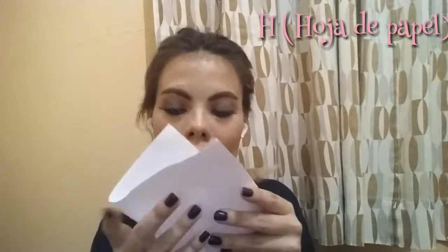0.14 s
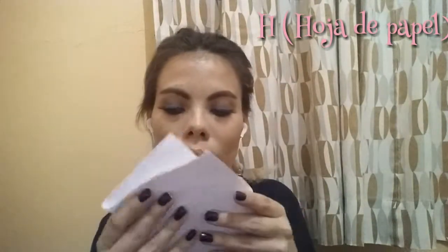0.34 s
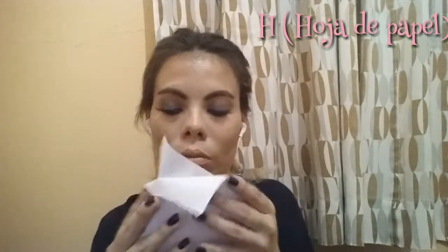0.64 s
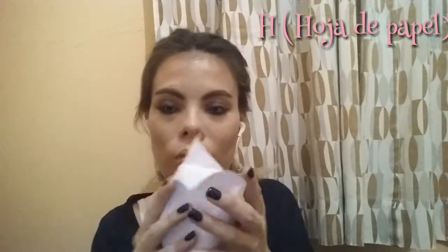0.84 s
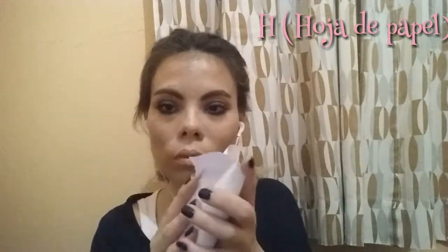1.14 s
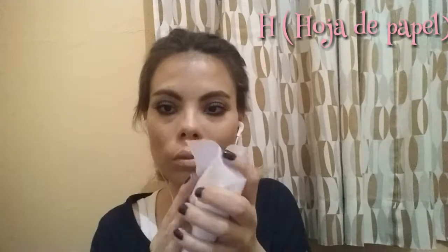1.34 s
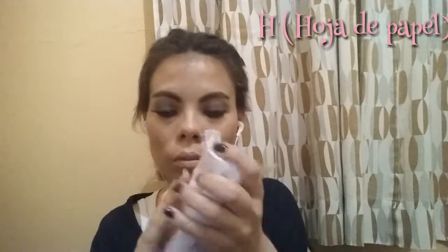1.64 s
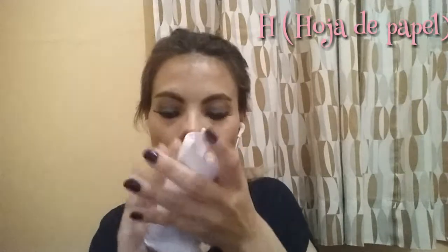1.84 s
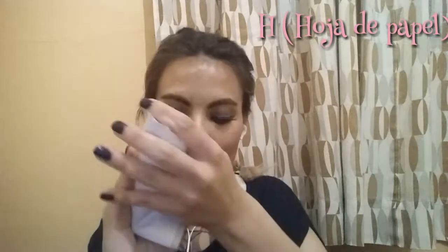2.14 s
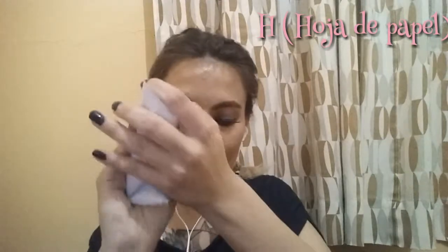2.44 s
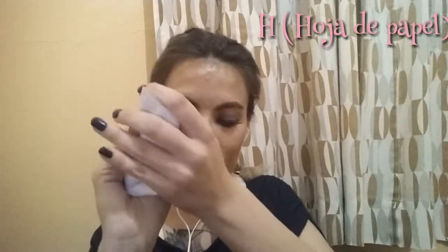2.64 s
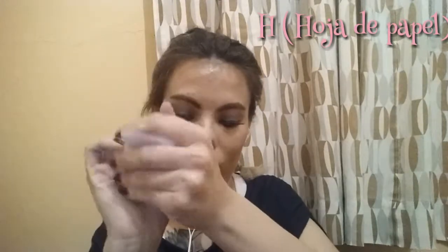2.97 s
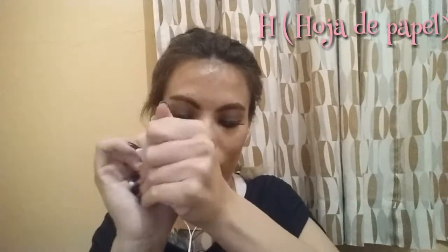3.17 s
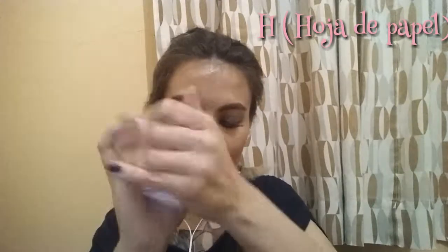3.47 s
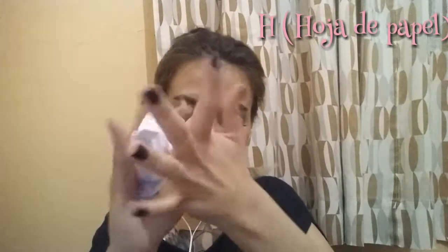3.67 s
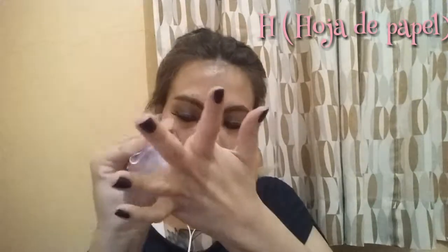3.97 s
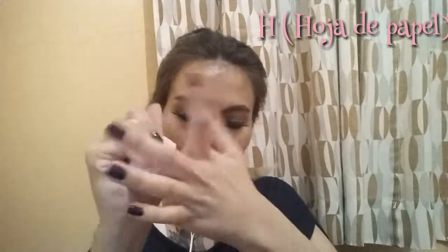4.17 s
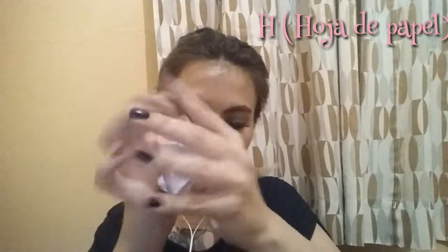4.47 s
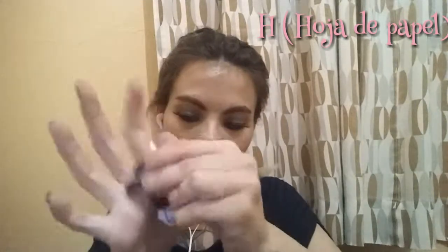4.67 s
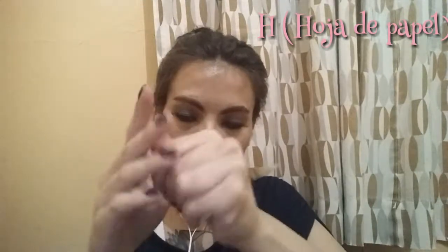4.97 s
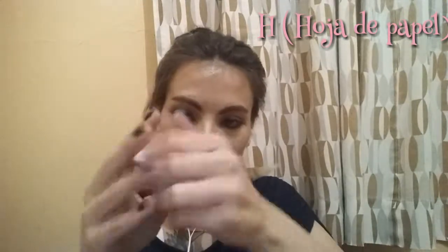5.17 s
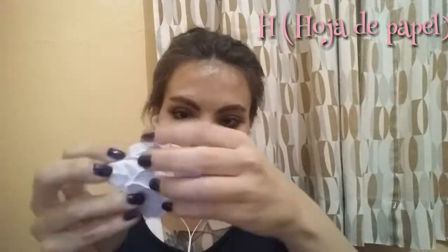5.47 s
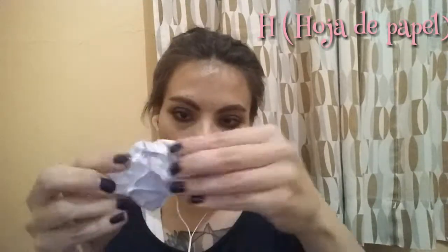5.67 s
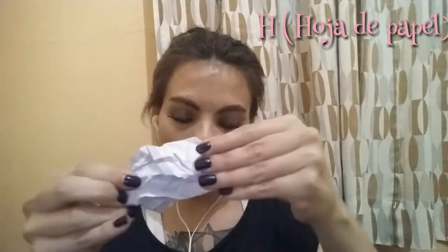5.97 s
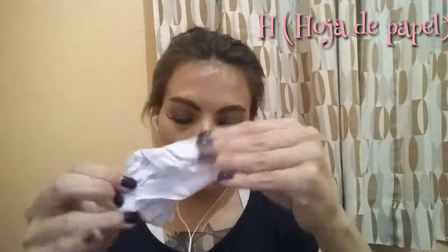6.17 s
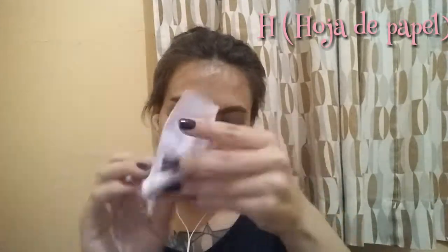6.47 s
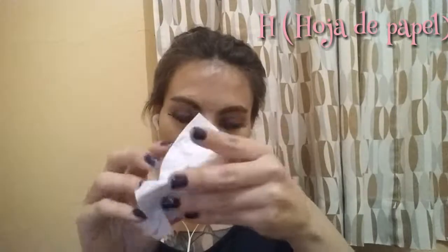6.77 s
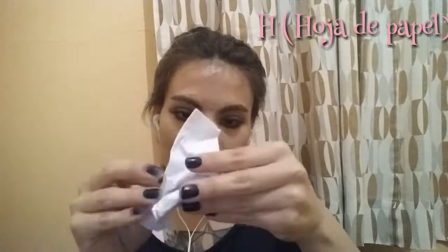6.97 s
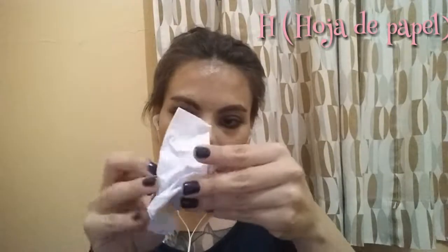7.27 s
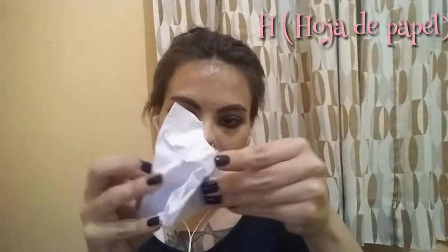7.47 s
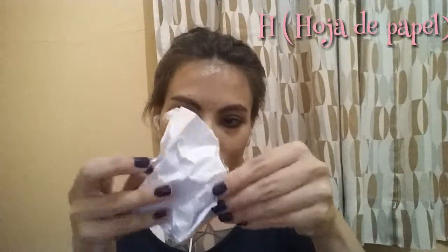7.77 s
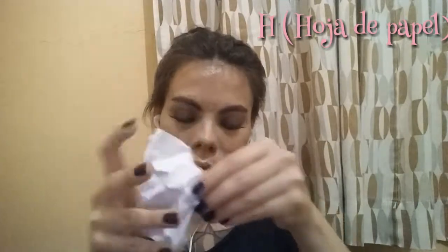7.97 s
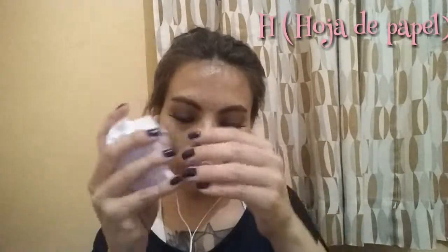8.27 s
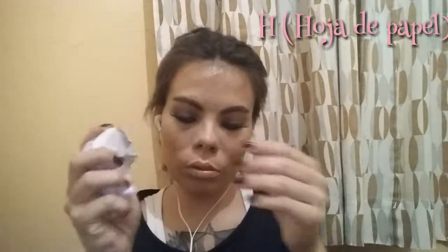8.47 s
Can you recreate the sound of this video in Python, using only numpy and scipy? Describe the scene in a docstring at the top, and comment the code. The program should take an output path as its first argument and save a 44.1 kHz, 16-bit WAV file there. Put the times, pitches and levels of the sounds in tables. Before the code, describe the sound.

Close, dry paper crumpling: clustered crackles in quick uneven squeezes, crisp snaps on top, thinning and quieting as the ball is opened, then scrunched again.

```python
"""A sheet of paper is crumpled into a ball, opened and crumpled again close to a small microphone.
Creases give way in clumps: pulses excite damped facet resonances, with filtered noise as paper rustle.
Larger creases buckle as sharp snaps, each a kick and dying noise through its own resonances.
Low thumps are decaying sines. The open sheet radiates bass, the tight ball hardly any.
A dry room, made of decaying noise reflections, and faint coloured hiss lie below."""
import sys
import numpy as np
from scipy import signal
from scipy.fft import rfft, irfft
from scipy.io import wavfile

SR = 44100
rng = np.random.default_rng(int(sys.argv[2]) if len(sys.argv) > 2 else 0)


def wav_record(signal):
    """Record a signal, one row per channel, as 16-bit PCM in the file named by sys.argv[1]."""
    frames = np.transpose(np.atleast_2d(signal))
    bounded = np.clip(frames, -1, 1)
    # unit amplitude maps onto the largest positive 16-bit level
    quanta = np.round(bounded * 32767).astype(np.int16)
    wavfile.write(sys.argv[1], SR, quanta)


N = 380141  # samples

# bursts of crackle set off by each squeeze or slip of the fingers; treble is relative to the crackle:
# start_s, hold_s, level_db, treble_db
SQUEEZES = [(0, 0.12, -60.5, -14.5), (0.197, 0.28, -61.5, -15), (0.364, 0.07, -59, -7),
            (0.438, 0.00084, -50, -18), (0.648, 0.014, -61.5, -23), (0.748, 0.0031, -49, -11),
            (0.784, 0.052, -55, -6), (0.818, 0.003, -45.5, -29), (0.864, 0.23, -61, -18.5),
            (1.01, 0.017, -54, -7), (1.247, 0.034, -49, -15.5), (1.384, 0.028, -56.5, -36),
            (1.462, 0.0031, -43, -8), (1.655, 0.022, -42.5, -15), (1.706, 0.072, -53, -21.5),
            (1.953, 0.002, -45.5, -1), (1.982, 0.11, -45.5, -17), (2.171, 0.021, -48, -18),
            (2.234, 0.062, -50, -18.5), (2.454, 0.034, -51, -12.5), (2.5, 0.75, -59, -41.5),
            (2.545, 0.14, -52.5, -20.5), (2.668, 0.075, -48, -23.5), (2.807, 0.039, -46, -19),
            (2.946, 0.039, -54.5, -15.5), (3.139, 0.004, -43, -10), (3.21, 0.042, -53.5, -10),
            (3.536, 0.02, -47, -15), (3.599, 0.025, -50.5, -9.5), (3.714, 0.044, -60.5, -40),
            (3.807, 0.041, -60, -45), (3.96, 0.038, -52.5, -16), (4.046, 0.0055, -49.5, -23),
            (4.165, 0.086, -54, -11.5), (4.451, 0.0036, -61, -10), (4.478, 0.014, -51, -11),
            (4.515, 0.025, -49, -14), (4.65, 0.0051, -52.5, -8), (4.687, 0.12, -55.5, -22),
            (4.741, 0.0073, -50, -8), (4.88, 0.049, -56.5, -18), (4.943, 0.018, -57, 1.5),
            (5.265, 0.0078, -52.5, -1), (5.282, 0.11, -61.5, -9.5), (5.371, 0.0012, -50.5, -20),
            (5.585, 0.04, -64, -14), (5.653, 0.0014, -50, -10), (5.788, 0.053, -61, -6),
            (5.91, 0.057, -64, -11), (5.967, 0.24, -66.5, -19), (6.044, 0.017, -57, -11.5),
            (6.3, 0.014, -53.5, -7), (6.539, 0.0035, -60, -18), (6.578, 0.059, -59, -11.5),
            (6.713, 0.008, -54, -7.5), (6.752, 0.13, -55.5, -15), (6.981, 0.0017, -49, -19),
            (7.07, 0.018, -51.5, -16), (7.167, 0.093, -69, -33), (7.491, 0.027, -51, -12.5),
            (7.557, 0.058, -47, -7.5), (7.748, 0.018, -47.5, -10.5), (7.935, 0.0014, -50.5, -11),
            (8.16, 0.0049, -58, -35), (8.229, 0.026, -64.5, -26), (8.313, 0.062, -60.5, -18),
            (8.366, 0.0016, -53.5, -6.5), (8.513, 0.056, -59, -9)]
# time for the crackle to rise or fall by 10 dB: a fixed part plus a share of the hold
ATTACK_S, ATTACK_PER_HOLD = 0.0047, 0.93
RELEASE_S, RELEASE_PER_HOLD = 0.02, 0.26
TREBLE_STEEPER = 1.43  # ratio of treble slope to crackle slope in dB: it comes later and goes sooner
# paper slides evenly on paper, with softer ticks and denser, more even pops: start_s, end_s
SLIDES = [(0, .4), (2.32, 2.65), (7.12, 7.7)]
# bass of the sheet relative to the crackle, weaker as it is balled up: time_s, bass_db
SHEET_BASS = [(0, -5), (.25, -9), (.45, -4), (.85, -4.5), (1.05, -17.5), (1.3, -8.5), (1.75, -14.5),
              (2.1, -14.5), (2.6, -18.5), (3.15, -18.5), (3.42, -31), (3.57, -9), (4.3, -36.5),
              (4.55, -21.5), (5.3, -23.5), (5.6, -21), (5.85, -21.5), (6.6, -25.5), (6.85, -7.5),
              (7.1, -26.5), (7.8, -18.5), (8.62, -26.5)]
# relative level of the upper middle: time_s, gain_db
BRIGHTNESS = [(0, 3.5), (1.2, 4.5), (2, -5.5), (2.75, -7), (3.6, 4), (4.7, -1.5), (5.2, 3), (7.25, -2.5),
              (7.6, 0), (8.62, 8)]
# paper as the microphone colours it, relative density per Hz: frequency_hz, density_db
PAPER_SPECTRUM = [(60, -52), (129, -26.5), (285, -22), (523, -17), (758, -11), (1180, -3.5), (1630, -5),
                  (2490, -1.5), (4450, -6.5), (6450, -11.5), (7960, -24.5), (9590, -27.5), (12000, -35),
                  (15600, -43)]
# borders between deep bass, bass, middle, treble and top: edge_hz
BAND_EDGES_HZ = [230, 720, 6800, 11000]
# buckling creases; peak is that of the middle band, treble is relative to it, decay is nominal:
# start_s, peak_db, ring_hz, treble_db, decay_s
SNAPS = [(0.426, -32, 950, -7, 0.0042), (0.445, -29, 1410, -28, 0.021), (0.476, -22.5, 3430, -5.5, 0.019),
         (0.616, -23, 3080, -46, 0.012), (0.641, -35, 2430, -29, 0.004), (0.704, -39, 1090, -24, 0.016),
         (0.732, -43.5, 1260, 5, 0.009), (0.791, -21, 2140, -11.5, 0.012), (0.81, -18, 2130, -12.5, 0.016),
         (0.816, -23, 2240, -41, 0.0032), (0.962, -37, 3180, -49, 0.013), (1.069, -34, 2570, -18, 0.0059),
         (1.094, -33, 1260, -31, 0.021), (1.287, -29.5, 1960, -19, 0.0039),
         (1.331, -30.5, 1880, -23, 0.015), (1.616, -35.5, 1180, -8.5, 0.09),
         (1.653, -15, 3790, -15.5, 0.0026), (1.945, -33, 1950, -10, 0.077), (2.048, -32, 2780, -33, 0.013),
         (2.151, -33, 2140, -40, 0.026), (2.229, -36, 1180, -9, 0.019), (2.246, -33, 2490, -13.5, 0.067),
         (2.6762, -26.5, 1850, -57, 0.0022), (2.831, -25.5, 3060, -3.5, 0.0096),
         (2.888, -19.5, 1680, -14.5, 0.012), (2.955, -25.5, 2160, -3, 0.01), (3.07, -33.5, 3600, -61, 0.01),
         (3.1381, -22, 1960, -4.5, 0.013), (3.183, -33, 4600, -27, 0.0087), (3.209, -34, 4860, -11, 0.011),
         (3.218, -12, 2330, -70, 0.0055), (3.238, -33.5, 1940, -8.5, 0.015),
         (3.293, -35.5, 3270, -10, 0.0082), (3.392, -42.5, 2220, -44, 0.0099),
         (3.428, -37, 3240, -44, 0.0057), (3.408, -44, 2470, -40, 0.006), (3.549, -32.5, 3596, -9, 0.02),
         (3.568, -31, 880, -2, 0.011), (3.602, -42, 1510, -14, 0.012), (3.618, -29.5, 2620, -13, 0.015),
         (3.977, -34.5, 2260, -26, 0.0057), (4.049, -33, 2160, -19, 0.012), (4.2, -17.5, 3380, -40, 0.0081),
         (4.278, -41.5, 3100, -11, 0.065), (4.456, -38, 3000, -20, 0.024), (4.517, -29, 1740, -5, 0.011),
         (4.647, -38.5, 1830, -43, 0.012), (4.666, -31, 1550, -30, 0.0058), (4.683, -41, 2000, -30, 0.015),
         (4.751, -25.5, 1670, -13, 0.0045), (4.866, -29.5, 1840, -48, 0.01),
         (4.907, -27, 2490, -10.5, 0.0021), (5.058, -49, 3800, -35, 0.015),
         (5.317, -32.5, 2430, -6.5, 0.013), (5.61, -40.5, 5070, -7.5, 0.015),
         (5.803, -38.5, 2700, -8, 0.028), (5.816, -36, 2850, -1, 0.027), (5.853, -35.5, 1870, -38, 0.019),
         (5.8814, -19.5, 1940, -50, 0.01), (6.859, -33, 1330, -15, 0.012), (7.082, -35, 2800, -17.5, 0.03),
         (7.748, -34.5, 3000, -7, 0.029), (7.943, -32.5, 2160, -11.5, 0.024),
         (8.277, -34, 3100, -33, 0.012), (8.366, -30, 4700, -35, 0.017), (8.512, -22.5, 2880, -14.5, 0.009),
         (8.577, -38, 3860, -5.5, 0.068)]
# low thumps, the first right at the start; level is before the envelope: start_s, level_db, pitch_hz
THUMPS = [(0.01, -61, 129), (0.442, -48, 137), (0.795, -61, 169), (2.634, -45.5, 314), (3.138, -45.5, 403)]
ROOM_T60_S, ROOM_DB = 0.1, -23
# background hiss, relative density per Hz: frequency_hz, density_db
HISS_SPECTRUM = [(20, -4), (60, -1), (500, -1), (1500, -9), (5500, -7.5), (7500, -17), (16000, -22.5)]
HISS_DB = -78.5  # rms
STOP_EDGE_HZ = 15900  # from here up the top is at least 40 dB down


def crackle(per_s, spread_db, clump_db, rustle_db, count=10):
    """Clustered impulses: creases pop in clumps, facets ring by size, and sliding paper rustles between."""
    t = np.arange(N) / SR
    sliding = sum((t >= start) & (t < end) for start, end in SLIDES)
    uneven = 1 - 0.5 * sliding
    clump = uneven * clump_db * (slips(per_s=60, fade_s=0.008) + 0.6 * drift(100))

    sizes_db = uneven * spread_db * np.minimum(rng.exponential(1, N), 4)
    sizes = from_db(sizes_db) * rng.choice([-1, 1], N)
    # sliding evens the pops out: smaller spread, denser in time
    chance = per_s * from_db(clump) / uneven ** 2 / SR
    pops = sizes * (rng.random(N) < chance) + 1e-18
    facet = rng.integers(0, count, N)
    rings = 1.1 * pops
    for k, hz in enumerate(np.geomspace(500, 11000, count)):
        ring = resonance(pops * (facet == k), hz, 0.5 * hz)
        rings = rings + ring * np.sqrt(9000 / hz)  # big facets ring low
    rustle = rng.standard_normal(N) * from_db(rustle_db + clump)

    enclosed = rms_one(folds(rms_one(rings) + rustle, shift_db=2.8))
    direct = 0.3 * rms_one(rings)  # outer creases are heard directly
    bands = five_bands(coloured(enclosed + direct, PAPER_SPECTRUM))
    top_filter = signal.butter(6, BAND_EDGES_HZ[-1], "high", fs=SR, output="sos")
    bands[4] = signal.sosfilt(top_filter, bands[4])

    level_db, treble_db = hands(t)
    bass_db, = in_time(SHEET_BASS, t)
    bright_db, = in_time(BRIGHTNESS, t)
    # an open sheet is fuller in the low middle too
    bands[2] = shelve(bands[2], 0.3 * (bass_db + 10.5), bright_db)
    air_db = treble_db + 0.4 * level_db + 5  # only a hard crush reaches the top
    levels = tilts(bass_db, treble_db, top_db=air_db)
    bed = sum(rms_one(band) * from_db(level_db + db) for band, db in zip(bands, levels))
    tick_db = -10 - 0.3 * bass_db  # a tight ball ticks more than an open sheet
    return bed + uneven * ticks(per_s=280) * from_db(level_db + tick_db)


def hands(t):
    """Addition of powers: attack, hold and release of all squeezes give crackle level and treble in dB."""
    start, hold, level_db, treble_db = np.transpose(SQUEEZES)[:, :, None]
    coarse = t[::64]
    rise = np.maximum(start - coarse, 0) / (ATTACK_S + ATTACK_PER_HOLD * hold)
    fall = np.maximum(coarse - start - hold, 0) / (RELEASE_S + RELEASE_PER_HOLD * hold)
    lost_db = 10 * (rise + fall)
    middle = np.sum(from_db(level_db - lost_db) ** 2, axis=0) + 1e-11
    treble_each_db = level_db + treble_db - TREBLE_STEEPER * lost_db
    treble = np.sum(from_db(treble_each_db) ** 2, axis=0) + 1e-13
    crackle_db = np.interp(t, coarse, 10 * np.log10(middle))
    return crackle_db, np.interp(t, coarse, 10 * np.log10(treble / middle))


def slips(per_s, fade_s):
    """Stick-slip: paper gives way in jerks, a sudden rise and then a fade; mean 0, spread 1."""
    jerks = rng.exponential(1, N) * (rng.random(N) < per_s / SR)
    fading = signal.lfilter([1], [1, -np.exp(-1 / (fade_s * SR))], jerks + 1e-18)
    level = np.log(0.15 + fading)
    return rms_one(level - level.mean())


def ticks(per_s, count=8):
    """Impulse excitation: single small creases give way now and then, in loose runs; rms 1."""
    sizes = from_db(4 * np.minimum(rng.exponential(1, N), 3)) * rng.choice([-1, 1], N)
    born = sizes * (rng.random(N) < per_s * from_db(5 * drift(8)) / SR) + 1e-18
    facet = rng.integers(0, count, N)
    rings = 0
    for k, hz in enumerate(np.geomspace(1100, 5500, count)):
        rings = rings + resonance(born * (facet == k), hz, 0.76 * hz) * 5000 / hz
    return rms_one(coloured(0.1014 * born + rings, PAPER_SPECTRUM))


def folds(x, shift_db, count=44):
    """Cavity resonance: pockets between folds and fingers swell and fade, the small ones most."""
    roots = np.linspace(np.sqrt(70), np.sqrt(15500), count)  # square roots of the pitches in Hz
    widths_hz = 3.2 * (roots[1] - roots[0]) * roots
    total = 0
    for k, (root, width_hz) in enumerate(zip(roots, widths_hz)):
        swell = from_db(shift_db * min(root / 45, 1) * drift(8.4))
        pocket = resonance(x, root ** 2, width_hz) / np.sqrt(root)
        total = total + pocket * swell * (-1) ** k
    return total


def shelve(x, low_db, high_db):
    """Shelving: raise or lower what lies under and over the strongest ring of the paper."""
    low_filter = signal.butter(2, 1600, "low", fs=SR, output="sos")
    high_filter = signal.butter(2, 3300, "high", fs=SR, output="sos")
    low, high = signal.sosfiltfilt(low_filter, x), signal.sosfiltfilt(high_filter, x)
    return x + (from_db(low_db) - 1) * low + (from_db(high_db) - 1) * high


def tilts(bass_db, treble_db, top_db):
    """Radiation by size: a small sheet loses its deepest bass fastest, a tight ball the top; band dB."""
    return 3.67 * bass_db + 5.5, bass_db, 0, treble_db, 0.5 * bass_db + top_db


def snaps(size=3072):
    """Buckling: a kick, the dying chatter of the freed facet and short echoes ring at a pitch."""
    out, t = np.zeros(N + size), np.arange(size) / SR
    chatter, chance = rng.standard_normal((len(SNAPS), size)), rng.random((len(SNAPS), 4))
    for (start, peak_db, hz, treble_db, decay_s), noise, luck in zip(SNAPS, chatter, chance):
        dying = from_db(-60 * t / np.clip(decay_s, 0.002, 0.06))
        kick = np.minimum(decay_s / 0.12, 0.6) * noise * dying  # a clean buckle hardly chatters
        kick[0] = np.sign(noise[0])
        lags = ((0.0003 + 0.0022 * luck[:3]) * SR).astype(int)  # short echoes from hands and face close by
        kick[lags] += 0.11 * np.sign(noise[lags])

        ring = resonance(resonance(kick, hz, 1.3 * hz), hz, 1.3 * hz)
        overtone = resonance(kick, (2 + luck[3]) * hz, 0.5 * hz)
        mix = 0.62 * from_db(0.34 * treble_db) * kick + 1.36 * ring + 0.79 * overtone
        bands = five_bands(coloured(mix, PAPER_SPECTRUM))
        at = round(start * SR)
        bass_db = in_time(SHEET_BASS, start)[0] - 6  # an open sheet thumps with every buckle
        levels = tilts(bass_db, treble_db, top_db=1.2 * treble_db - 2)
        for band, db in zip(bands, levels):
            out[at:at + size] += from_db(peak_db + db) * band / np.abs(band).max()
    return out[:N]


def thumps():
    """Damped vibration: each low thump is a sine that dies within a few cycles."""
    out = np.zeros(N)
    t = np.arange(SR // 10) / SR
    for start, level_db, hz in THUMPS:
        at = round(start * SR)
        envelope = np.exp(-t * hz / 1.3) * np.minimum(t * hz, 1)  # rises over one cycle
        out[at:at + len(t)] += from_db(level_db) * np.sin(2 * np.pi * hz * t) * envelope
    return out


def room(x):
    """Reverberation: dull reflections start after a few milliseconds and die exponentially."""
    t = np.arange(SR // 4) / SR
    tail = rng.standard_normal(len(t)) * from_db(-60 * t / ROOM_T60_S) * (t > 0.003)
    tail = signal.lfilter([1], [1, -0.4], tail)
    return signal.fftconvolve(x, tail / np.linalg.norm(tail))[:N]


def hiss():
    """Stationary noise: white noise shaped by a fixed spectrum, at a fixed level."""
    return from_db(HISS_DB) * rms_one(coloured(rng.standard_normal(N), HISS_SPECTRUM))


def from_db(db):
    """Logarithmic level: decibels to amplitude gain."""
    return 10 ** (np.asarray(db) / 20)


def rms_one(x):
    """Normalisation of power: scale to rms 1."""
    return x / np.sqrt(np.mean(x ** 2) + 1e-20)


def in_time(rows, t):
    """Linear interpolation: columns of a curve table at times t."""
    s, *columns = np.transpose(rows)
    return [np.interp(t, s, column) for column in columns]


def drift(rate_hz, size=32):
    """Low-passed chance: noise through a double one-pole filter, computed every size samples."""
    r = np.exp(-2 * np.pi * rate_hz * size / SR)
    noise = rng.standard_normal(N // size + 1002)
    slow = signal.lfilter([1], [1, -2 * r, r * r], noise)[1000:]  # skip the settling
    return np.interp(np.arange(N) / size, np.arange(len(slow)), rms_one(slow))


def resonance(x, hz, width_hz):
    """Two-pole resonance: gain about 1 at the pitch, decay set by the bandwidth."""
    r = np.exp(-np.pi * width_hz / SR)
    poles = [1, -2 * r * np.cos(2 * np.pi * hz / SR), r * r]
    return signal.lfilter([(1 - r * r) / 2, 0, (r * r - 1) / 2], poles, x)


def response(spectrum, size=4096):
    """Minimum phase: folding the cepstrum gives a causal impulse response with the given spectrum."""
    hz, db = np.transpose(spectrum)
    grid = np.maximum(np.arange(size // 2 + 1) * SR / size, 1)
    grid_db = np.interp(np.log(grid), np.log(hz), db)
    cepstrum = irfft(np.log(from_db(grid_db)))
    cepstrum[1:size // 2] *= 2
    cepstrum[size // 2 + 1:] = 0
    return irfft(np.exp(rfft(cepstrum)))


def coloured(x, spectrum):
    """Convolution: pass a sound through a spectrum."""
    return signal.fftconvolve(x, response(spectrum))[:len(x)]


def five_bands(x):
    """Band splitting: deep bass, bass, middle, treble and top of a sound."""
    pairs = [(pair, "band") for pair in zip(BAND_EDGES_HZ, BAND_EDGES_HZ[1:])]
    kinds = [(BAND_EDGES_HZ[0], "low"), *pairs, (BAND_EDGES_HZ[-1], "high")]
    return [signal.sosfilt(signal.butter(3, hz, kind, fs=SR, output="sos"), x) for hz, kind in kinds]


def scene():
    """Superposition: paper, its room and the hiss add up."""
    paper = crackle(per_s=1100, spread_db=4, clump_db=2.2, rustle_db=-4.5)
    paper = paper + snaps() + thumps()
    return (paper + from_db(ROOM_DB) * room(paper) + hiss())[None]


def record(dry):
    """Band limiting: a steep low-pass cuts the top."""
    return signal.sosfilt(signal.cheby2(12, 40, STOP_EDGE_HZ, fs=SR, output="sos"), dry)


dry = scene()
out = record(dry)
wav_record(out)
```